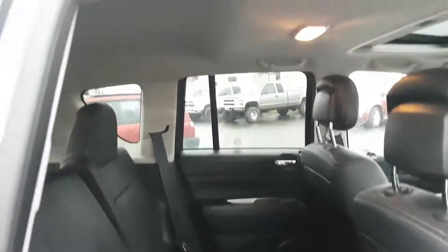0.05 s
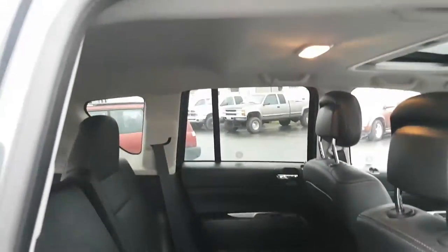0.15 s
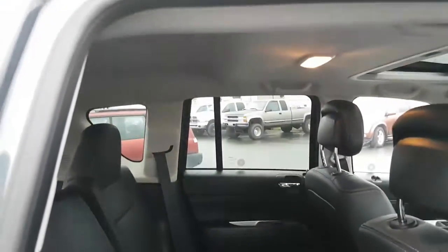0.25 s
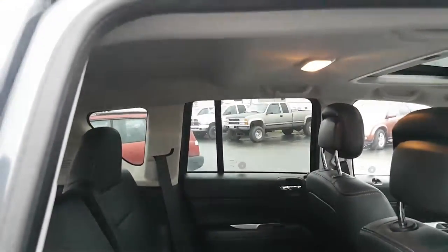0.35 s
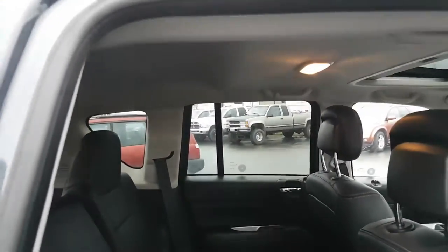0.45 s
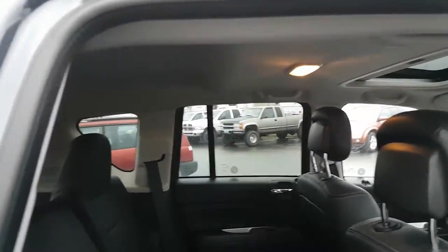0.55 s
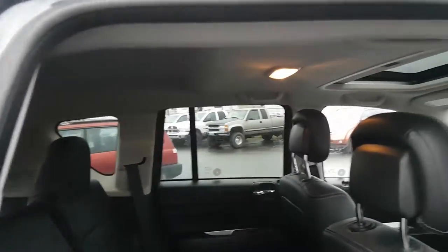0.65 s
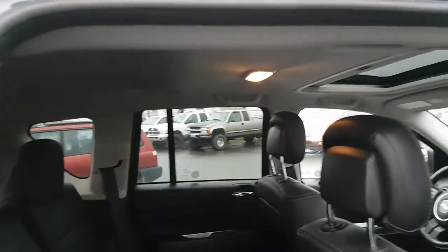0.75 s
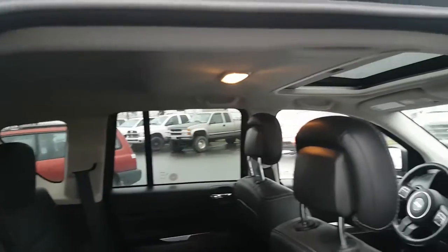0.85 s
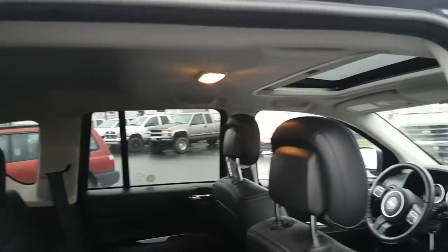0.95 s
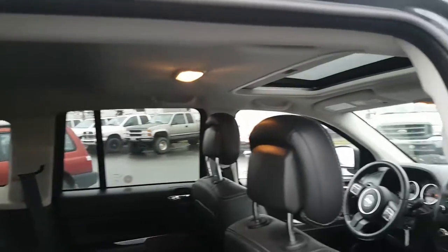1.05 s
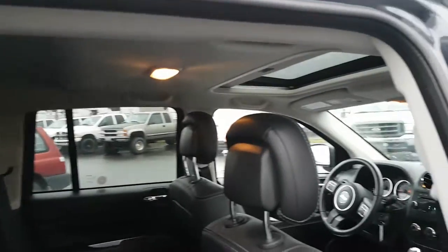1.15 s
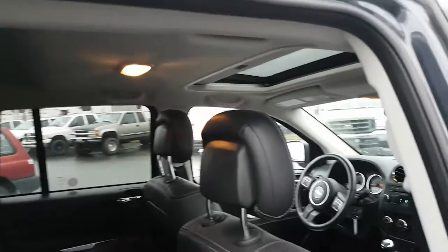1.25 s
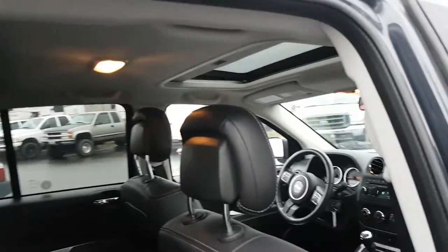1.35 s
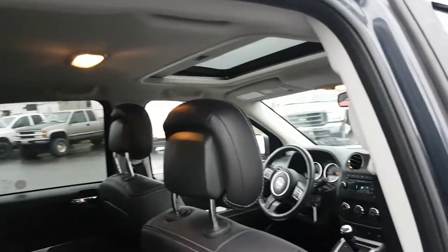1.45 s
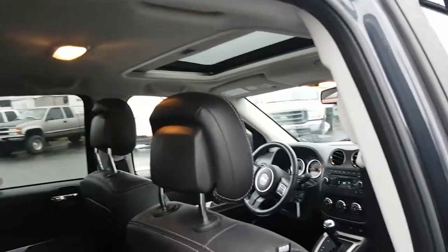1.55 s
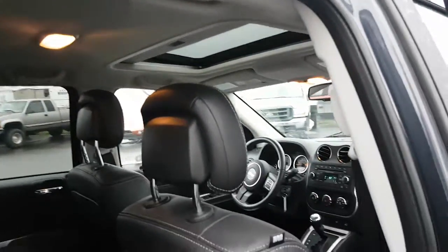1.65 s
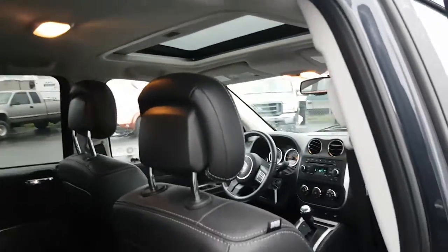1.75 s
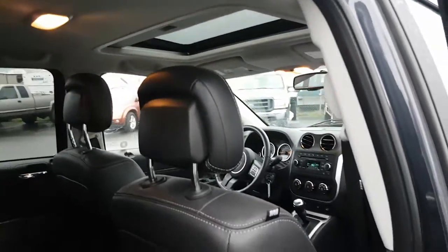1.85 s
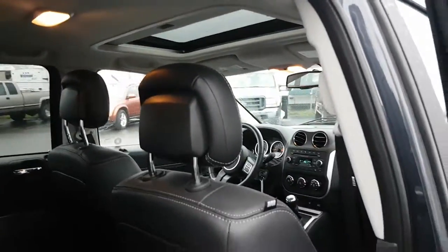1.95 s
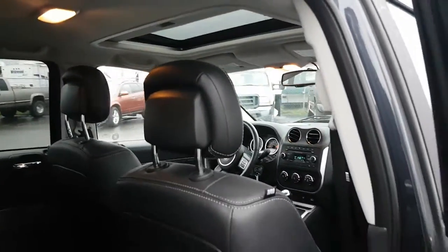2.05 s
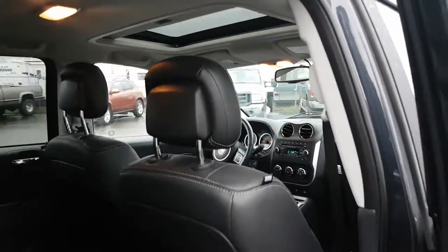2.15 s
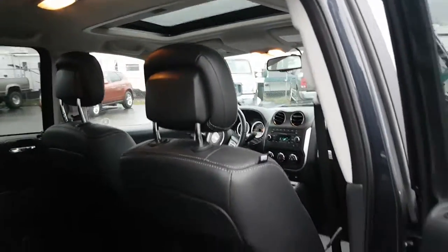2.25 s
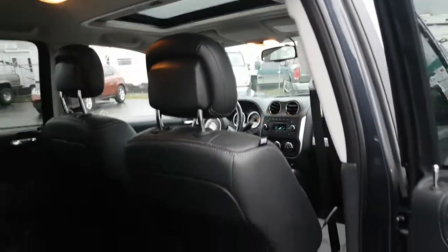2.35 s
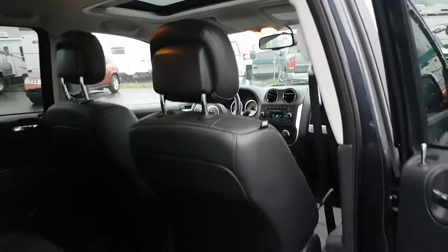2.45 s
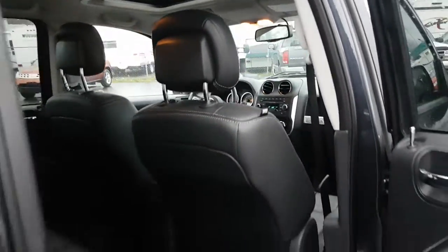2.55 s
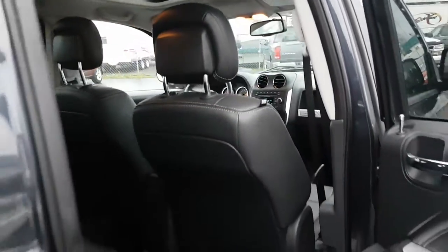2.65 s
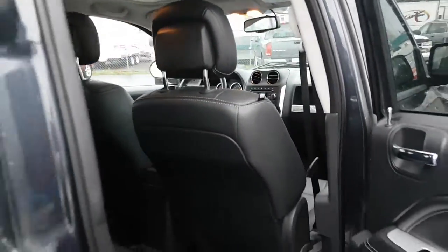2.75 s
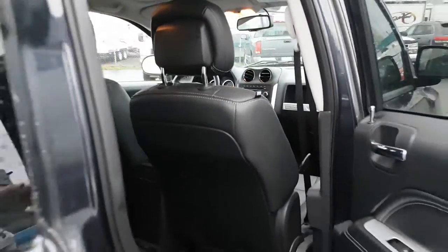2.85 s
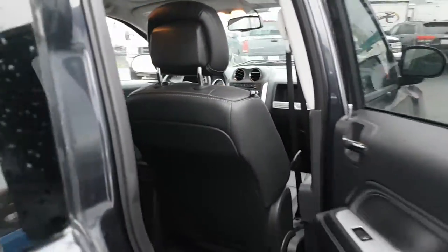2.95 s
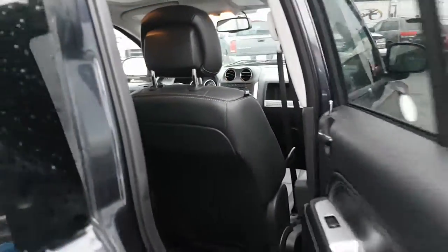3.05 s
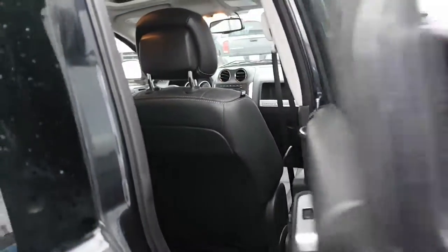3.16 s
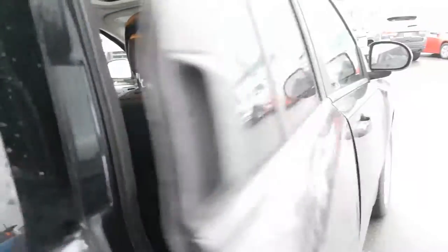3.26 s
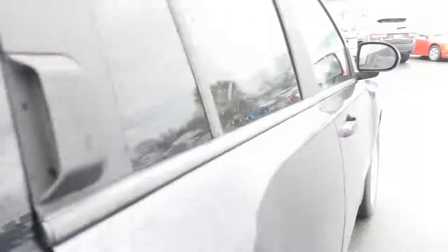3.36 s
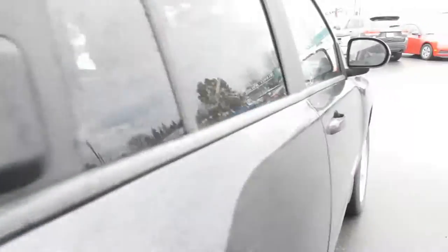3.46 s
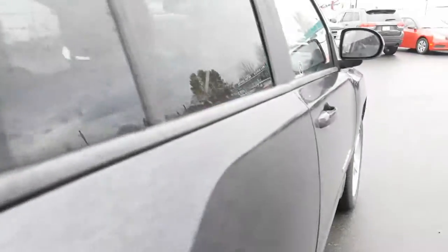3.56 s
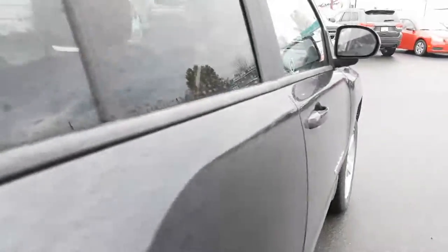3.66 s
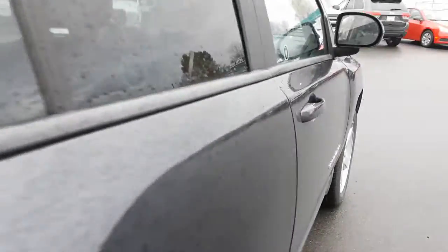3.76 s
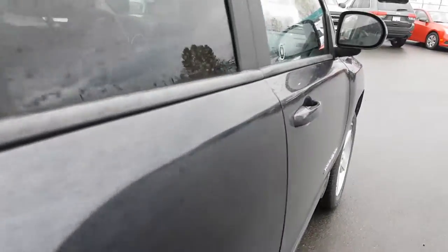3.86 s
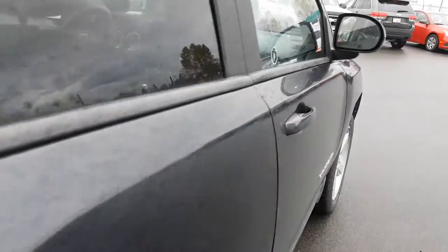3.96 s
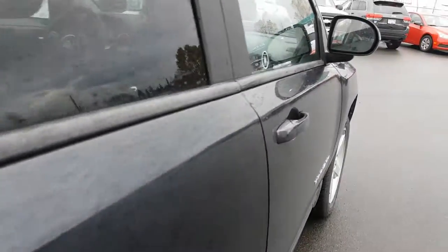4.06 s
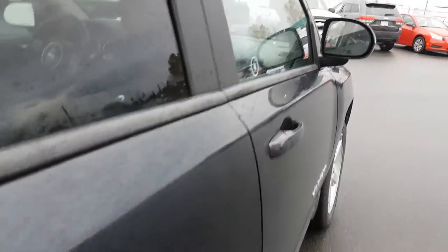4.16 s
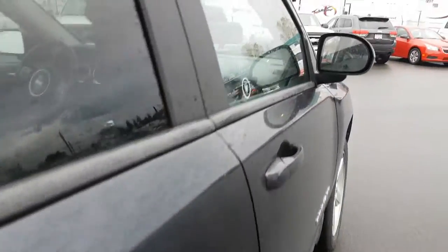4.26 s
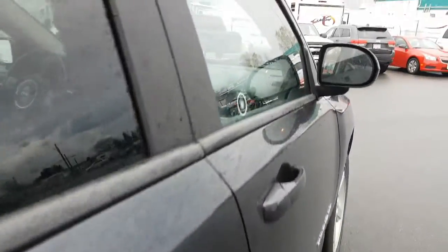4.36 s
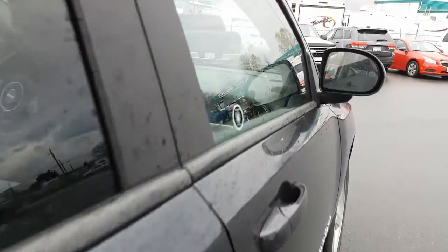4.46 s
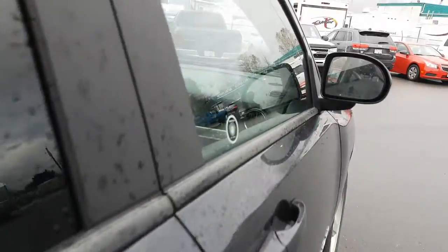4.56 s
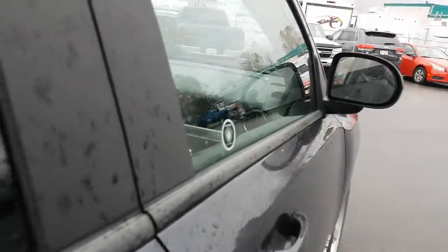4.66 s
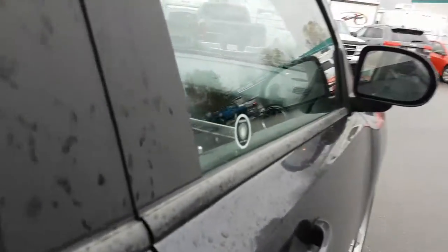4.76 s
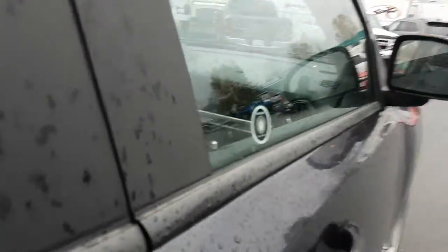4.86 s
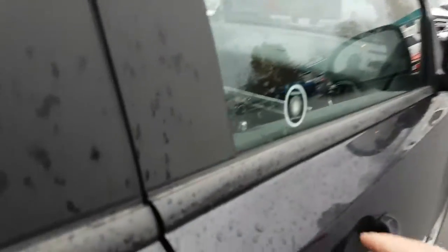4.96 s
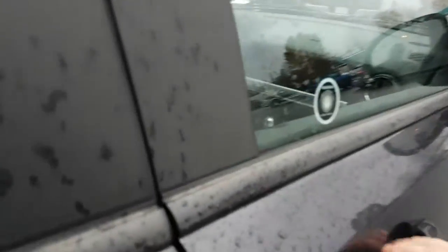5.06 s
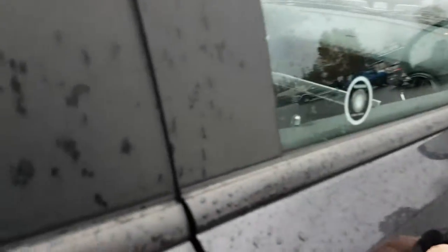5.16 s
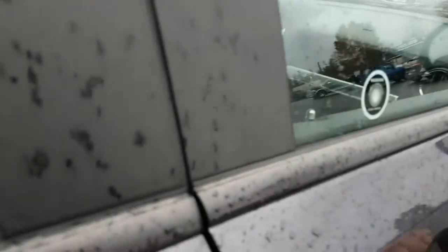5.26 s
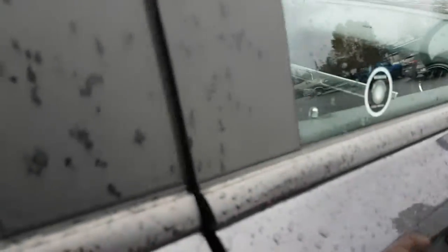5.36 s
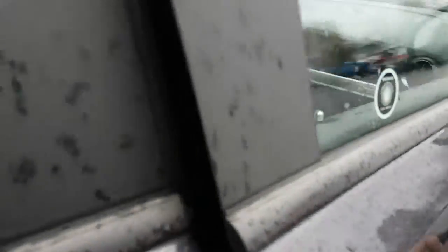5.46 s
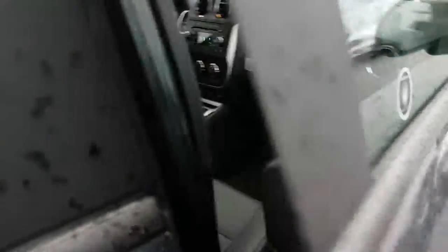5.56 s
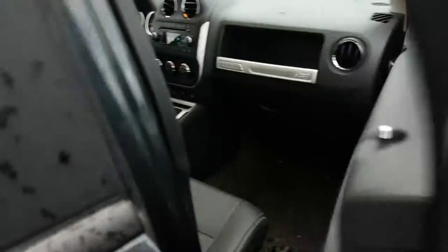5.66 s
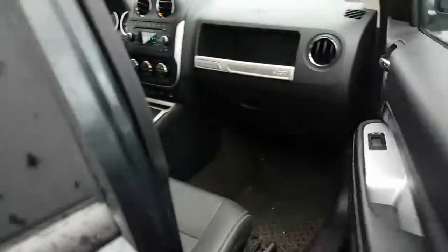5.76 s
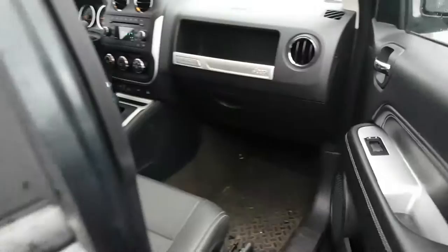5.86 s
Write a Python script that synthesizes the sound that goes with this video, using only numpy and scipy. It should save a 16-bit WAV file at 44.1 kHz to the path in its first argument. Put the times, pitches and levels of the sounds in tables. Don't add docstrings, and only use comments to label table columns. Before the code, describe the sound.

Quiet wet-lot traffic hum and gritty foot scuffs, then a heavy car door slam, followed by a front handle clunk and the door knocking open.

```python
import sys
import numpy as np
from scipy import signal
from scipy.fft import rfft, irfft, next_fast_len
from scipy.io import wavfile
from scipy.ndimage import uniform_filter1d

SR = 44100
rng = np.random.default_rng(int(sys.argv[2]) if len(sys.argv) > 2 else 0)


def store_wav(level_fs):
    pcm = np.round(np.clip(np.atleast_2d(level_fs), -1, 1) * 32767)
    wavfile.write(sys.argv[1], SR, pcm.T.astype(np.int16))


def elevation(decibels):
    levels = np.asarray(decibels, float)
    return 10 ** (levels / 20)


N = 260471

# [f/Hz, level/dB, t60/s]
FRONT_BODY = [(48.6, -39, 0.15), (95, -13, 0.27), (146, 1.5, 0.095), (216, -1, 0.23), (327, -5, 0.19),
              (420, -6, 0.11)]
# [f/Hz, level/dB, t60/s]
HANDLE = [(447, -0.5, 0.052), (575, -0.5, 0.092), (740, -6.5, 0.064), (1030, -7, 0.019), (1170, -10, 0.024),
          (1440, -25, 0.046), (2200, -32, 0.034)]


def level(x, db):
    return x * elevation(db) / np.sqrt(np.mean(x ** 2))


def peak(x, db):
    return x * elevation(db) / np.abs(x).max()


def colour(x, table, lag=0.):
    size = next_fast_len(x.shape[-1] + 512)
    hz = np.arange(size // 2 + 1) * SR / size + 1e-3
    table_hz, table_db = np.array(table).T
    db = np.interp(np.log(hz), np.log(table_hz), table_db)
    delay = np.exp(-2j * np.pi * hz * lag / SR)
    return irfft(rfft(x, size) * elevation(db) * delay, size)[..., :x.shape[-1]]


def band(x, lo_hz, hi_hz):
    sos = signal.butter(2, [lo_hz, min(hi_hz, 20000)], "band", fs=SR, output="sos")
    return signal.sosfilt(sos, x)


def walk(rate_hz):
    k = int(SR / rate_hz)
    held = np.repeat(rng.standard_normal(N // k + 1), k)
    return 2.72 * uniform_filter1d(uniform_filter1d(held, k), k)[:N]


def add(out, s, x):
    i = int(s * SR)
    out[i:i + len(x)] += x[:N - i]


def grit(count, spread_db):
    return rng.standard_normal(count) * elevation(spread_db * rng.exponential(size=count))


def ring(modes, t, stretch, blur):
    hz, db, t60_s = np.transpose(modes)[:, :, None]
    chance = rng.standard_normal((len(modes), 2))
    steps = rng.standard_normal((len(modes), len(t) // 32 + 1))
    wander = np.cumsum(np.repeat(steps, 32, axis=1)[:, :len(t)], axis=1)
    turns = hz * (1 + 0.018 * chance[:, 1:]) * t + blur * hz * wander / SR
    x = elevation(db + 2 * chance[:, :1]) * np.sin(2 * np.pi * turns)
    return np.sum(x * np.exp(-t * np.log(1000) / (t60_s * stretch)), axis=0)


def door(blows, body, panel, push_ms, crack_t60_s, crunch_db, top_db, ring_share, chatter_ms):
    # [f/Hz, level/dB]
    crack_colour = [(1200, -33.5), (2500, -2.5), (4000, -4), (5500, -4.5), (7500, -10), (10500, -11),
                    (13000, -14), (16000, -14)]
    out, t = np.zeros(N), np.arange(SR // 3) / SR
    short = t[:8000]
    chatter_s = chatter_ms / 1000
    top_hz, top_mode_db = panel[-1][:2]
    outline = [(150, -25.0)] + [mode[:2] for mode in panel] + [(2.1 * top_hz, top_mode_db - 14)]
    roof = [(1.3 * top_hz, 0), (4 * top_hz, -40)]
    push = np.sin(np.pi * np.clip(t[:1000] * 1000 / push_ms, 0, 1))
    rise = np.clip(short / 0.0012, 0, 1)
    crunch_fall = np.exp(-short * np.log(1000) / (0.063 * ring_share))
    crack_fall = np.exp(-short / chatter_s) + 0.1 * np.exp(-short * np.log(1000) / crack_t60_s)
    for k, (s, panel_db, thump_db, crack_db) in enumerate(blows):
        thump = signal.fftconvolve(ring(body, t, ring_share, blur=.3), push)[:len(t)]
        contacts = grit(2000, 4.0) * np.exp(-t[:2000] / chatter_s)
        chatter = uniform_filter1d(contacts, size=9, origin=-4)
        rattle = signal.fftconvolve(ring(panel, short, ring_share, blur=.25), chatter)
        crunch = colour(grit(8000, 1), outline) * rise * crunch_fall
        crack = colour(grit(8000, 2.9) * rise * crack_fall, crack_colour)
        crack = colour(crack, [(5000, 0.0014), (16000, top_db)])
        add(out, s, (-1) ** k * peak(thump, thump_db))
        add(out, s, peak(colour(rattle, roof), panel_db))
        add(out, s, peak(colour(crunch, roof), panel_db + crunch_db))
        add(out, s, peak(crack, crack_db + 4.5))
    return out


def duck(late_s):
    duck_s, duck_db = 3.416, -10
    sink_s, hold_s, climb_s = .17, 0.61, 0.32
    t = np.arange(N) / SR - duck_s
    sink = 1 - np.exp(-np.clip(t - late_s, 0, 9) / sink_s)
    return duck_db * sink * np.clip(1 - (t - hold_s) / climb_s, 0, 1)


def traffic_levels():
    # [t/s, level/dB]
    passing = [
        (0.0, -51),
        (1.2, -49.5),
        (2.6, -49.5),
        (3.4, -48.5),
        (4.5, -50),
        (4.75, -47.5),
        (5.0, -46),
        (5.6, -48.5),
        (5.91, -49),
    ]
    swell_db = np.interp(np.arange(N) / SR, *np.transpose(passing))
    return swell_db + duck(0), swell_db + 11.5 + 0.92 * duck(late_s=.08)


def traffic(hiss_db, hum_db):
    # [f/Hz, level/dB per Hz]
    traffic_colour = [(28, -24.5), (50, -7), (70, -0.5), (120, -1), (250, -10), (450, -15.5), (580, -14),
                      (1000, -24), (1700, -22.5), (2800, -27.5), (4300, -27.5), (5500, -36), (8000, -55.5),
                      (15000, -73)]
    # [f/Hz, level/dB]
    open_air = [(90, -0.5), (300, 1), (430, 1.5), (650, -2), (1100, 3), (1950, -3), (2700, 1), (4000, -0.5)]
    back_out_s, move_s = 2.6, 1.23
    road, swell_db = 0, 0.14 * walk(0.8)
    near, far = (level(colour(rng.standard_normal(N), traffic_colour), 0) for _ in range(2))
    for hz in 24 * 2 ** np.arange(0, 9.1, .5):
        alike = np.clip(1.25 - hz / 900, 0, .98)
        left, other = band(near, hz, hz * 2 ** .5), band(far, hz, hz * 2 ** .5)
        right = alike * left + np.sqrt(1 - alike ** 2) * other
        base_db = hum_db + 1.03 if hz < 420 else hiss_db + 14.5
        road = road + elevation(base_db + swell_db + .5 * walk(12)) * np.array([left, right])
    outside = np.clip((np.arange(N) / SR - back_out_s) / move_s, 0, 1)
    return road + outside * (colour(road, open_air) - road)


def self_noise(hiss_db):
    # [f/Hz, level/dB]
    hiss_colour = [(2000, 12), (9000, -4.5), (15500, -2)]
    hiss = level(colour(rng.standard_normal((2, N)), hiss_colour), -65)
    return hiss * elevation(1.1 * (hiss_db - hiss_db.mean()))


def scuffs():
    # [t/s, level/dB, length/s]
    grip = [
        (0.653, -61, .006),
        (0.676, -60, .0077),
        (0.855, -57, .018),
        (1.056, -58, .0073),
        (1.492, -57, 0.008),
        (1.966, -67, .006),
        (2.007, -71, .006),
        (4.46, -64, .0049),
        (4.548, -64, 0.013),
    ]
    # [t/s, level/dB, length/s, centre f/Hz]
    dry_scuffs = [(0.904, -42, .006, 3000), (.929, -43, 0.0053, 4140), (1.308, -43, .006, 1900),
                  (1.621, -45.5, 0.017, 1730), (1.627, -49.5, 0.0068, 4270), (1.703, -37.5, .0056, 2800),
                  (2.068, -47, 0.018, 2820), (2.224, -43, 0.034, 3860), (2.863, -44.5, 0.028, 3750),
                  (3.134, -47.5, .038, 2070), (4.302, -44.5, 0.012, 3180), (4.384, -42, 0.018, 3500),
                  (5.715, -47.5, 0.0063, 4140), (5.799, -48.5, .006, 3830)]
    # [t/s, level/dB, length/s, centre f/Hz, fizz level/dB]
    wet_scuffs = [(1.68, -51, 0.007, 4500, -11), (1.69, -48.5, 0.05, 3220, -18),
                  (2.319, -52.5, 0.023, 4350, -18), (2.784, -46.5, 0.041, 3720, -19),
                  (3.165, -49, .0088, 4600, -15), (4.801, -37, 0.007, 4220, -14),
                  (4.81, -41.5, 0.015, 3900, -11), (4.823, -38, 0.021, 3900, -7.5),
                  (4.993, -50.5, 0.067, 4200, -17), (5.339, -48, 0.055, 3500, -16),
                  (5.736, -57, .028, 4330, -20.5)]
    # [t/s, level/dB]
    facing = [
        (0.9, 5),
        (2.2, 1),
        (2.9, -13),
        (4.35, -10),
        (4.8, -3),
        (5.0, -12),
        (5.9, -7),
    ]
    grip_hz, grip_right_db = 4870, 20.5
    dry_fizz_db, grip_fizz_db = -29, -10
    out, t = np.zeros((2, N)), np.arange(SR // 8) / SR

    def facing_db(s):
        return np.interp(s, *np.transpose(facing))

    rows = [(*row, facing_db(row[0])) for row in wet_scuffs]
    rows += [(*row, dry_fizz_db, facing_db(row[0])) for row in dry_scuffs]
    rows += [(*row, grip_hz, grip_fizz_db, grip_right_db) for row in grip]
    for s, db, length_s, hz, fizz_db, right_db in sorted(rows):
        rise = np.clip(t / (.001 + 0.18 * length_s), 0, 1)
        shape = rise * np.exp(-np.clip(t - length_s, 0, 1) / .005)
        slips = uniform_filter1d(np.repeat(rng.exponential(size=50) + 1, 120), 60)[:len(t)]
        clicks = grit(len(t), 2.4) * slips * shape
        scrape = band(band(clicks, hz / 2.4, hz * 1.3), hz / 2.0, hz * 1.45)
        fizz = band(band(clicks, 6500, 14500), 6000, 15000)
        over_db = 10 * np.log10(np.mean(shape ** 2))
        both = level(scrape, db + over_db) + level(fizz, db + fizz_db + over_db)
        add(out[0], s, both)
        add(out[1], s, both * elevation(right_db))
    return out


def palm():
    # [t/s, panel level/dB, thump level/dB, crack level/dB]
    pats = [
        (3.045, -29.5, -41, -64),
    ]
    # [f/Hz, level/dB, t60/s]
    trim = [(395, -4, 0.1), (563, 4, 0.085), (680, -24, 0.067), (900, -24.5, .05)]
    return door(pats, FRONT_BODY, trim, push_ms=4, crack_t60_s=.06, crunch_db=0, top_db=-12,
                ring_share=0.47, chatter_ms=5.5)


def swing():
    # [t/s, level/dB, hold/s, left minus right level/dB]
    gusts = [
        (3.067, -31.5, 0.066, 0.5),
        (3.342, -42, .01, 9),
        (5.124, -33.5, .01, 1),
        (5.197, -47, 0.057, -1),
        (5.453, -24.5, .01, 0.5),
        (5.52, -34.5, .01, -1),
        (5.613, -42, .01, -23),
        (5.724, -36, 0.069, -10),
        (5.873, -25, .01, -18),
        (5.897, -19.5, .002, -22.5),
    ]
    rise_s, fall_s = 0.039, 0.038
    t, gain = np.arange(N) / SR, np.zeros((2, N))
    for s, db, hold_s, pan_db in gusts:
        shape = np.clip(1 + (t - s) / rise_s, 0, 1) * np.exp(-np.clip(t - s - hold_s, 0, 9) / fall_s)
        gain = np.maximum(gain, [shape * elevation(db + side * pan_db / 2) for side in (1, -1)])
    noise = rng.standard_normal(N) + 0.19 * rng.standard_normal((2, N))
    air = colour(noise, [(20, -26.0), (60, 2), (110, 3), (190, -7.0), (350, -17.5), (800, -57.0)])
    return level(air, -1.8) * uniform_filter1d(gain, size=400)


def stay():
    # [t/s, level/dB]
    notches = [
        (3.105, -32),
        (3.130, -23.5),
        (3.168, -32),
    ]
    # [f/Hz, level/dB, t60/s]
    post = [(48, -3.5, 0.32), (69.4, 0, 0.15), (115, -13, 0.088)]
    out, t = np.zeros(N), np.arange(SR // 4) / SR
    for s, db in notches:
        add(out, s, peak(ring(post, t, 1, blur=0.18) * np.clip(t / 0.0065, 0, 1), db))
    return out


def slam():
    # [t/s, panel level/dB, thump level/dB, crack level/dB]
    blows = [(3.4155, -3.5, -17.5, -37.5), (3.421, -5, -19, -24), (3.425, -11, -13, -15),
             (3.430, -1, -1, -7), (3.434, -20.5, -8, -27), (3.439, -21, -3.5, -15.5), (3.445, -22, -6, -30),
             (3.456, -15.5, -9, -23), (3.464, -22.5, -9, -35.5), (3.472, -17.5, -8, -39),
             (3.490, -22.5, -8.5, -23), (3.493, -23, -12, -34), (3.509, -29, -19.5, -50)]
    # [f/Hz, level/dB, t60/s]
    rear_body = [(30.2, -9.5, 0.47), (58.8, -4.5, 0.42), (84.7, -4.5, 0.43), (134, -10, 0.45),
                 (178.6, -1.5, 0.29), (239, 1, 0.18), (299, 5.5, 0.2), (384, -17, 0.18), (450, -17, 0.067)]
    # [f/Hz, level/dB, t60/s]
    rear_panel = [(550, 5, .1), (633, 8, 0.059), (737, 3, 0.097), (851, 14, 0.07), (1090, 10, 0.026),
                  (1210, 1.5, 0.1), (1390, 3, 0.04), (1470, 1.5, 0.089), (1730, -10, 0.054),
                  (2360, -18, 0.055), (2540, -8.5, 0.071)]
    return door(blows, rear_body, rear_panel, push_ms=1.9, crack_t60_s=.045, crunch_db=0.0, top_db=-8,
                ring_share=0.64, chatter_ms=3)


def cabin():
    # [f/Hz, level/dB, t60/s]
    air_modes = [(59, 0, .38), (29, -12, .45)]
    out, t = np.zeros(N), np.arange(SR // 2) / SR
    add(out, 3.437, -peak(ring(air_modes, t, 1, blur=.1), -10))
    return out


def latch():
    # [t/s, panel level/dB, thump level/dB, crack level/dB]
    blows = [
        (5.100, -40, -42, -44.5),
        (5.401, -11, -22, -25.5),
        (5.404, -10, -13, -23),
        (5.409, -44, -8.5, -40),
        (5.418, -43, -12.5, -43),
        (5.435, -38, -8.5, -32),
        (5.897, -31, -20.5, -46),
    ]
    # [f/Hz, level/dB, t60/s]
    front_panel = [(540, 6, 0.027), (740, -2.5, 0.2), (960, 3, 0.049), (1150, 2, 0.038), (1370, -3.5, 0.17),
                   (1650, -3.5, 0.027), (1645, -1, 0.077), (2030, -12, 0.023), (2670, -4.5, 0.029),
                   (3500, -4.5, .025)]
    return door(blows, FRONT_BODY, front_panel, push_ms=1.54, crack_t60_s=0.027, crunch_db=1.5,
                top_db=-12, ring_share=0.46, chatter_ms=2.8)


def knocks():
    # [t/s, panel level/dB, thump level/dB, crack level/dB]
    blows = [
        (5.357, -19.5, -22.5, -27),
        (5.364, -20.5, -12, -30.5),
        (5.511, -27.5, -23, -49),
        (5.648, -32.5, -37.5, -51),
    ]
    return door(blows, FRONT_BODY, HANDLE, push_ms=1.4, crack_t60_s=0.054, crunch_db=1.0, top_db=-12,
                ring_share=0.66, chatter_ms=4)


def buffets():
    # [t/s, panel level/dB, thump level/dB, crack level/dB]
    blows = [
        (5.814, -35, -12.5, -57),
        (5.851, -36, -14, -56),
        (5.872, -31, -22, -47),
        (5.888, -16, -4, -48),
    ]
    return door(blows, FRONT_BODY, HANDLE, push_ms=2.56, crack_t60_s=.06, crunch_db=-1.5, top_db=-8,
                ring_share=0.63, chatter_ms=7.2)


def lot(x):
    t60_s, echo_db = 0.13, -12
    t = np.arange(SR // 3) / SR
    tail = rng.standard_normal((2, len(t))) * 0.00094 ** (t / t60_s) * (t > .004)
    tail = colour(tail, [(150, -5), (500, 6.0), (3000, 5.5), (12000, -6.0)])
    tail = tail / np.sqrt(np.sum(tail ** 2) / 2)
    return elevation(echo_db) * signal.fftconvolve(x[None], tail, axes=1)[:, :N]


def scene():
    # [f/Hz, level/dB]
    hand_shade = [(2500, -1), (4000, -14), (8000, -2.5)]
    # [f/Hz, level/dB]
    right_port = [(100, 0), (350, 2), (700, -4), (1300, -4.5), (2200, 4), (2900, -6), (3600, -24.5),
                  (4300, 2.5), (5400, -30), (7000, -20), (8500, -19.5), (10000, -43), (13000, -26),
                  (16000, -24.5)]
    hiss_db, hum_db = traffic_levels()
    road = traffic(hiss_db, hum_db)
    feet = scuffs()
    rear = slam() + cabin()
    front = palm() + latch() + knocks()
    around = road + lot(rear + front + elevation(-2) * feet[0]) + swing()
    left = rear + front + feet[0] + elevation(-6.5) * buffets() + around[0]
    right = colour(rear, hand_shade, lag=20.2) + colour(front, hand_shade, lag=4.1)
    right = right + colour(feet[1], hand_shade, lag=-8.0)
    right = colour(right + around[1] + buffets(), right_port)
    return np.array([left, right]) + self_noise(hiss_db) + stay()


def top_cut(x):
    return signal.sosfilt(signal.butter(12, 15700, fs=SR, output="sos"), x)


def record(dry):
    rounded = dry / (1 + np.abs(dry) ** 6) ** (1 / 6)
    return top_cut(rounded)


dry = scene()
out = record(dry)
store_wav(out)
```